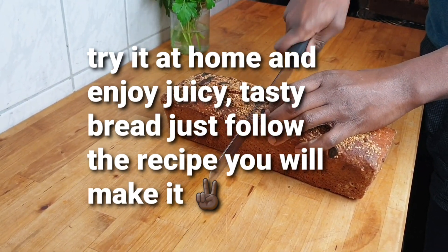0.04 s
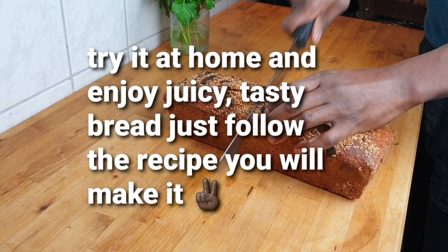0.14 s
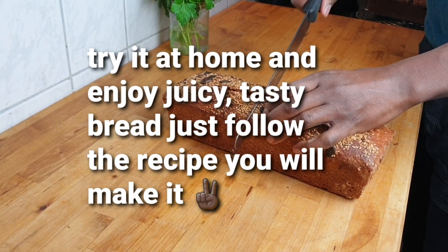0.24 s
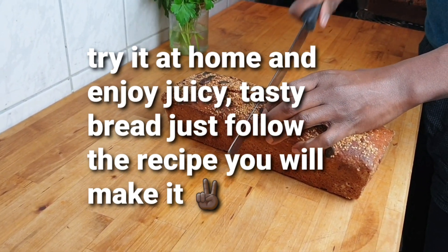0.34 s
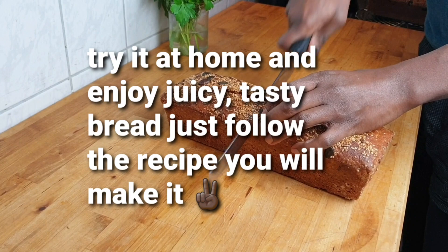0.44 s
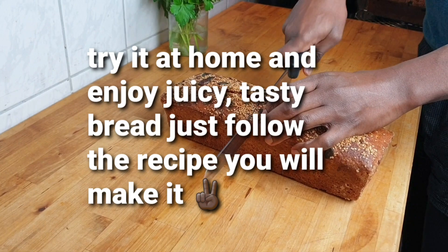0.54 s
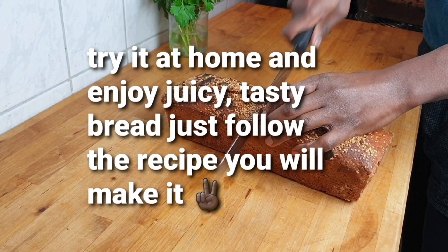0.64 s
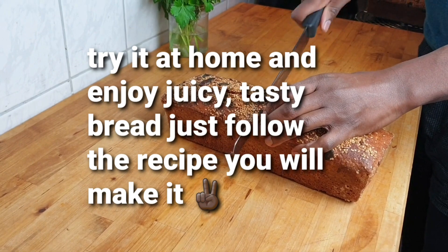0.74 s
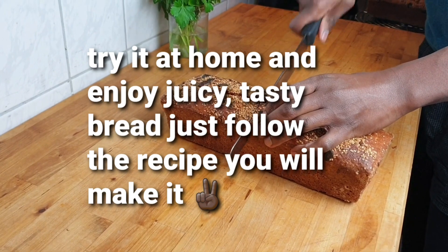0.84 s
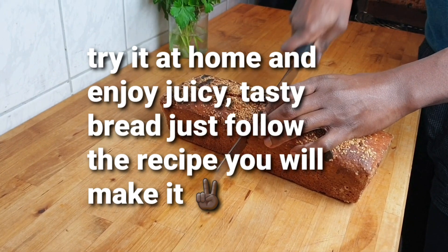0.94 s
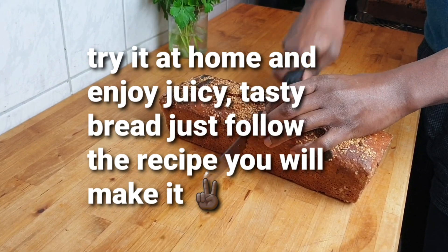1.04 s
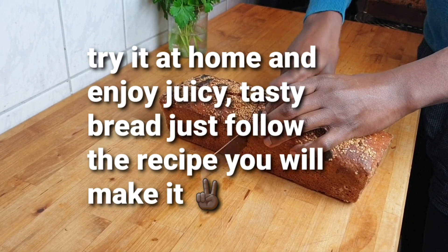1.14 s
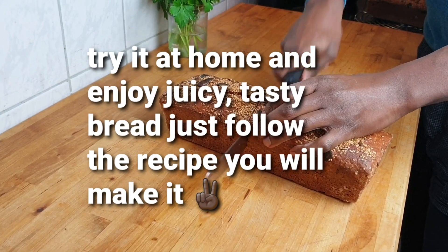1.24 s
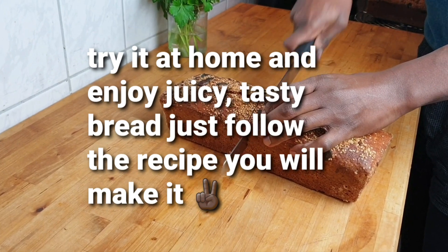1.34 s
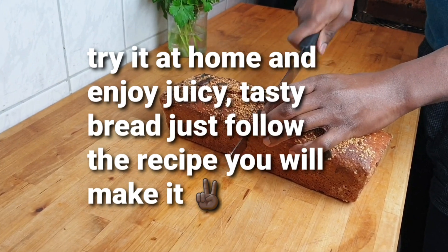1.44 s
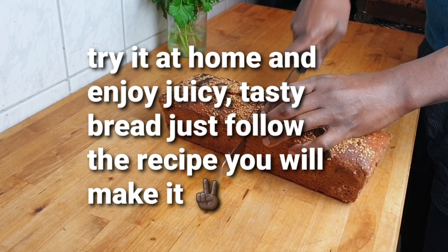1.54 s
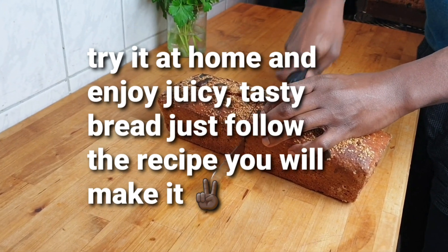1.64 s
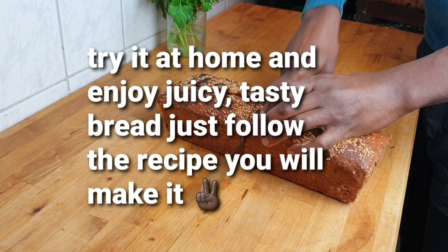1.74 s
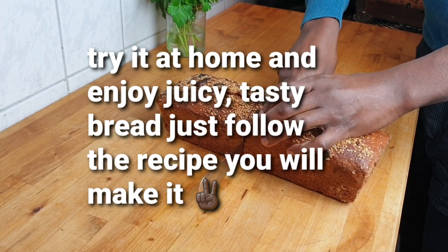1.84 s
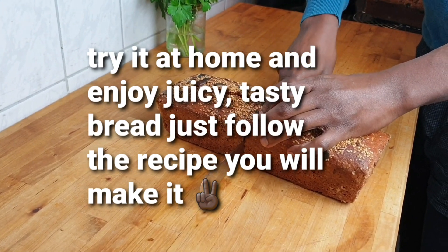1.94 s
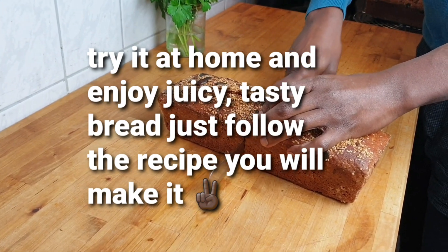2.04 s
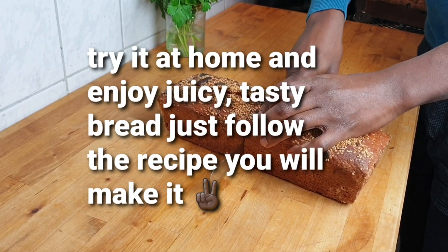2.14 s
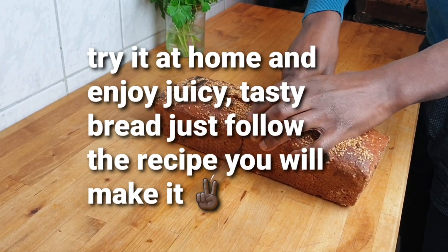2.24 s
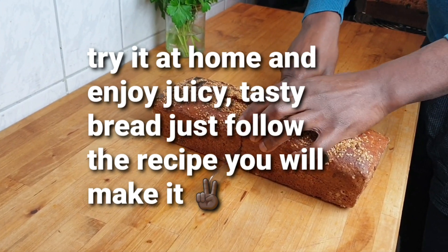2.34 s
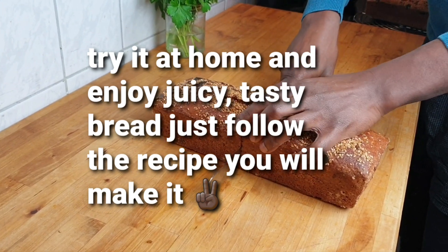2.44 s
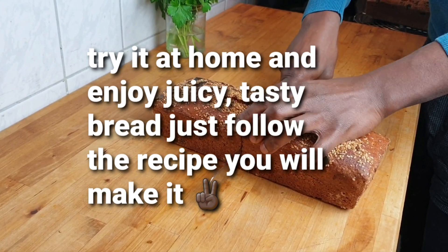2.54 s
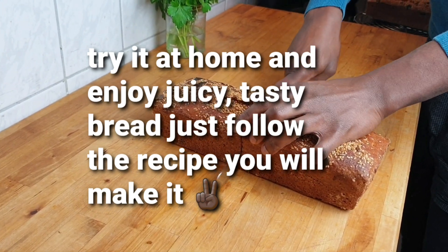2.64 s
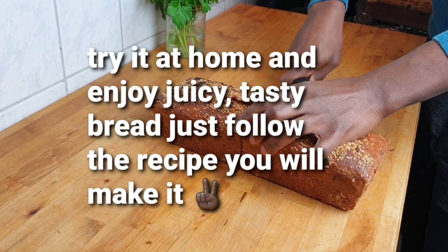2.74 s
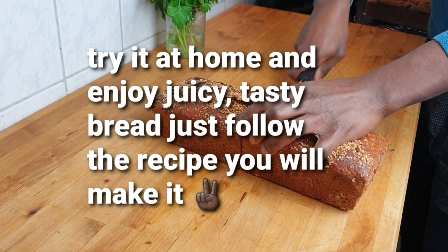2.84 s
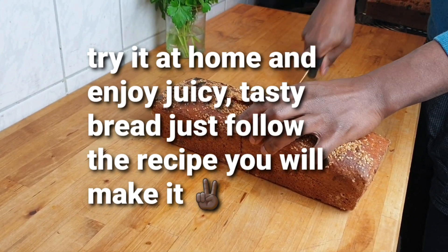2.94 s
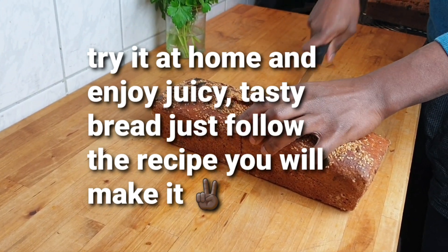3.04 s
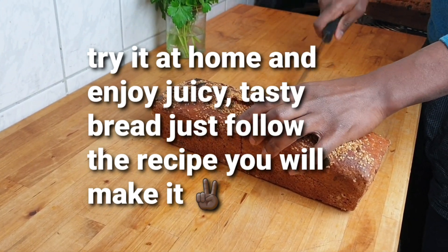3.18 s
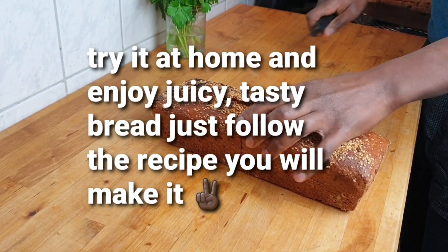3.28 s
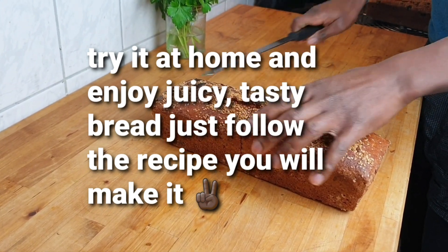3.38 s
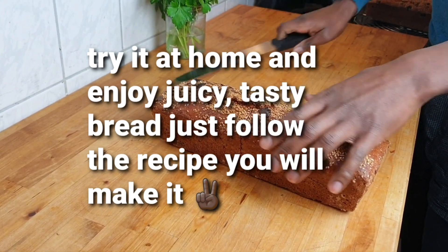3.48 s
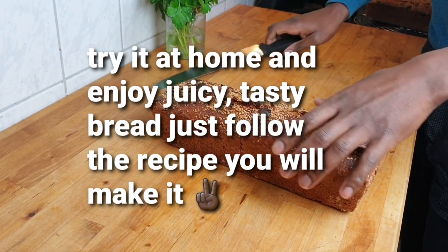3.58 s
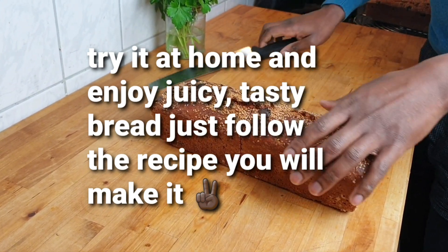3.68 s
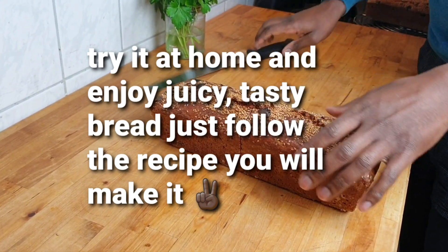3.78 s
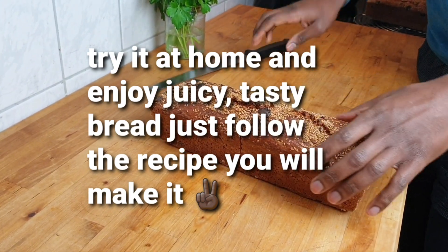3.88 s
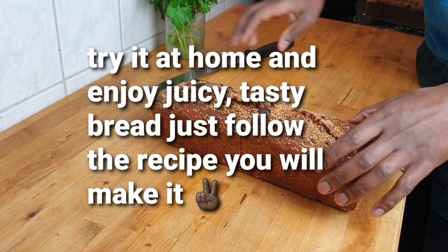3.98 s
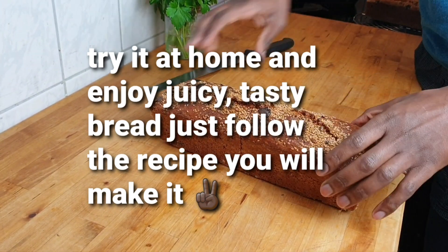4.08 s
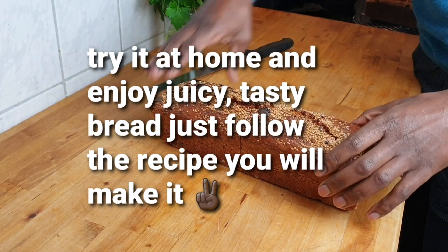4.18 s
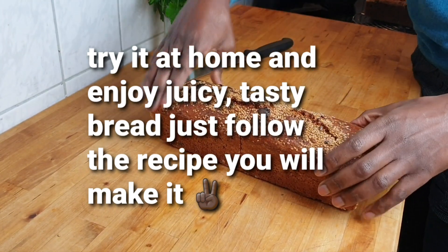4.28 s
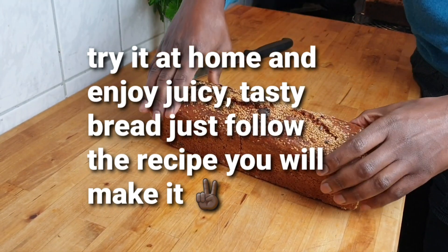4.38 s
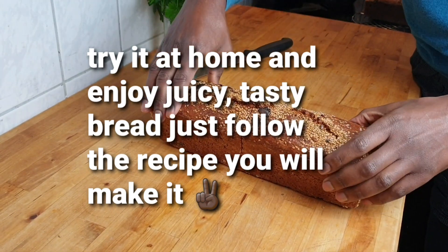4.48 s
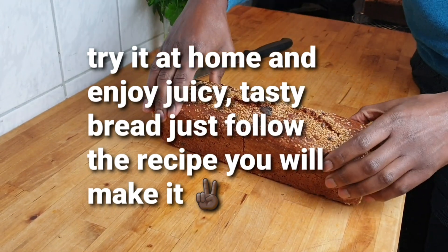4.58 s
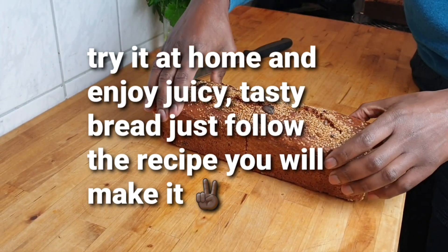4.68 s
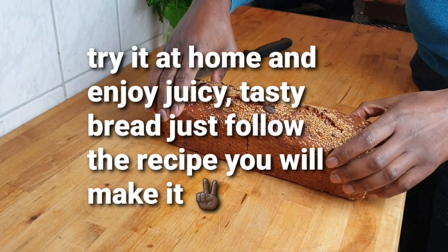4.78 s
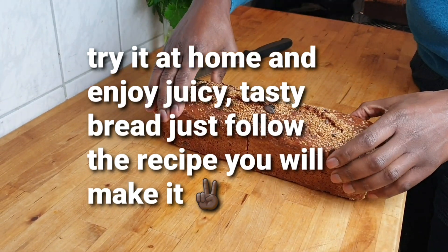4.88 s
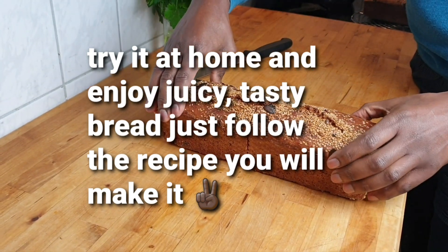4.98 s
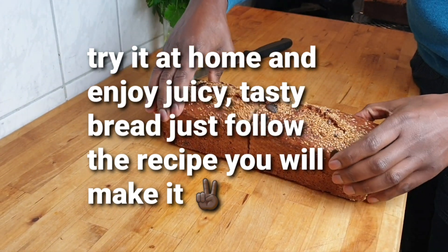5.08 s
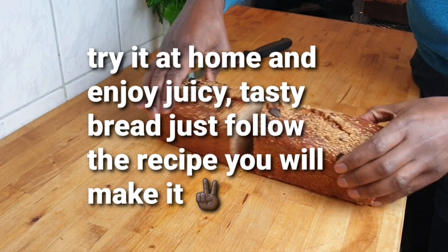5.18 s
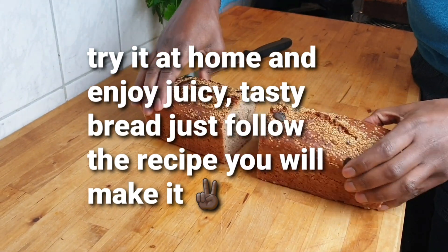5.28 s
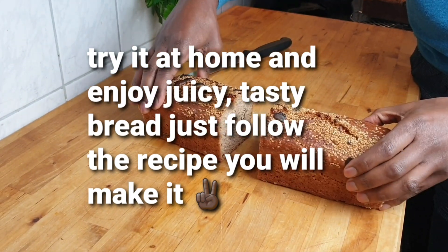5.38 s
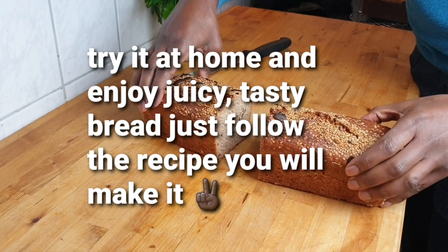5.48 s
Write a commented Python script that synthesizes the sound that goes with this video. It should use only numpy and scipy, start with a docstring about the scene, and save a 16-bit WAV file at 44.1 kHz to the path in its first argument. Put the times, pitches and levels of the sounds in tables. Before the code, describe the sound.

A knife saws in uneven, grainy strokes through a crusty loaf, booming the wooden counter, then drops with a clatter before the loaf bumps down.

```python
"""A knife saws through a crusty loaf: uneven noise, swelling with each stroke, drags, tears crumb and hisses on crust.
The loaf lies on a wooden counter that carries the microphone's stand, so the board booms as low, soft swings.
The blade is then dropped on the wood, where bright bursts and ringing tones clink as it rocks to rest.
Later a half loaf bumps down. A small hard kitchen answers with fading noise, and squeaks and a rumble are faint.
The microphone adds a steady hiss; only a faint part of the sound differs between left and right."""
import sys
import numpy as np
from scipy import signal
from scipy.fft import rfft, irfft, next_fast_len
from scipy.io import wavfile
from scipy.ndimage import uniform_filter1d, map_coordinates

SR = 44100
rng = np.random.default_rng(int(sys.argv[2]) if len(sys.argv) > 2 else 0)


def wav_out(sig):
    """Save sig, one row per channel (or a flat mono array), as 16-bit PCM at SR to the path in sys.argv[1]."""
    wavfile.write(sys.argv[1], SR, np.round(np.clip(np.atleast_2d(sig).T, -1, 1) * 32767).astype(np.int16))


def to_linear_factor(level_db):
    """Convert decibel levels (scalar or array-like) to linear amplitude factors."""
    exponent = np.asarray(level_db, float) / 20
    return 10 ** exponent


N = 243423  # length in samples

# ringing tones of the counter top: pitch_hz, width_hz, level_db
WOOD_TONES = [(201, 36, -3), (331.2, 110, -10), (515.5, 28, -4), (664, 34, -1.5), (786.2, 47, -4),
              (966.2, 29, 3), (1107, 46, -6.5), (1220, 82, -6.5), (1364, 200, -13), (1720, 89, -12),
              (1994, 960, -20)]
# colour of crust noise: pitch_hz, level_db (per Hz)
CRUST_COLOUR = [(2500, -21), (4130, -12.5), (5500, -4), (6740, 1.5), (8000, 6.5), (9730, 7.5), (11300, -3),
                (12200, -15), (14000, -22.5), (15000, -40), (15600, -90)]
# the knife rocks on the counter, each touch a clink and a knock: start_s, level_db
ROCKING_TOUCHES = [(3.7687, -37), (3.9802, -25), (4.0451, -26), (4.1015, -26.5), (4.1404, -30),
                   (4.175, -41)]


def unit(x):
    """Scale to an average strength (rms) of 1."""
    return x / np.sqrt(np.mean(x ** 2) + 1e-20)


def along(points, hz):
    """Read a curve of (Hz, value) points, with pitch on a log axis."""
    point_hz, value = np.transpose(points)
    return np.interp(np.log(hz + 1), np.log(point_hz + 1), value)


def filtered(x, response):
    """Multiply each frequency of x by a response, which may also shift its phase."""
    size = next_fast_len(x.shape[-1] + 8192)
    hz = np.fft.rfftfreq(size, 1 / SR)
    return irfft(rfft(x, size) * response(hz), size)[..., :x.shape[-1]]


def colour(x, spectrum):
    """Give x a smooth balance of low and high pitches."""
    return filtered(x, lambda hz: to_linear_factor(along(spectrum, hz)))


def resonate(x, tones):
    """Let x excite tones (Hz, width in Hz, dB), each a resonance that favours its own pitch."""
    def response(hz):
        total = 0
        for k, (centre, width, db) in enumerate(tones):
            loss = 1j * hz * width
            # neighbouring tones have opposite signs
            total = total + (-1) ** k * to_linear_factor(db) * loss / (centre ** 2 - hz ** 2 + loss)
        return total
    return filtered(x, response)


def wobble(rate):
    """A smooth random curve through rate random points a second."""
    points = rng.standard_normal(int(N / SR * 400) + 4)
    return map_coordinates(points, [np.arange(N) * np.clip(rate, 1, 390) / SR])


def grit(lumpy_db, rate, spike_db, share, patchy_db):
    """Friction: lumpy noise with small sudden slips and random patches of colour that make it grainy."""
    slips = (rng.random(N) < share) * to_linear_factor(spike_db * rng.random(N))
    lumps = to_linear_factor(lumpy_db * wobble(rate))
    z = signal.stft(rng.standard_normal(N) * lumps * (1 + slips), nperseg=256)[2]
    # smooth the patches over neighbouring pitches, then over time
    patches = uniform_filter1d(rng.standard_normal(z.shape), size=5, axis=0)
    patches = uniform_filter1d(patches, size=6, axis=1)
    return unit(signal.istft(z * to_linear_factor(patchy_db * unit(patches)), nperseg=256)[1][:N])


def rattles(rows, lumpy_db, rate):
    """Each contact is a lumpy burst of noise that starts at once and falls 20 dB over its length."""
    t = np.arange(N) / SR
    shape = np.zeros(N)
    for start, db, length, *_ in rows:
        shape += to_linear_factor(db - 20 * np.clip(t - start, 0, 1) / length) * (t >= start)
    return shape * rng.standard_normal(N) * to_linear_factor(lumpy_db * wobble(rate))


def unit_gain(response):
    """Gain that brings noise through a filter back to an average strength (rms) of 1."""
    return 1 / np.std(response(rng.standard_normal(N)))


def stroked(strokes, level_db, start_db, end_db, in_db_per_s, out_db_per_s, flat):
    """Gain over time: every stroke swells to its hardest moment, eases, and fades fast outside its span.
    start_db, end_db: drop from the hardest moment; a higher flat gives a flatter top."""
    start, hardest, end = [np.array(column)[:, None] for column in list(zip(*strokes))[:3]]
    t = np.arange(0, N / SR + .002, .002)
    before = np.clip((hardest - t) / (hardest - start), 0, 1)
    after = np.clip((t - hardest) / (end - hardest), 0, 1)
    drop_db = start_db * before ** flat + end_db * after ** flat
    drop_db += in_db_per_s * np.clip(start - t, 0, None)
    drop_db += out_db_per_s * np.clip(t - end, 0, None)
    gain = np.linalg.norm(to_linear_factor(level_db[:, None] - drop_db), axis=0)  # overlapping strokes add in power
    return np.interp(np.arange(N) / SR, t, gain)


def microphone_hiss():
    """The microphone's floor: steady coloured noise, alike on left and right."""
    # colour of the floor: pitch_hz, level_db (per Hz)
    hiss_colour = [(13, -34.5), (25, -10), (44, 0.5), (102, -5), (215, -28), (361, -34.5), (918, -33),
                   (3930, -41.5), (8710, -33.5), (11200, -41), (12200, -48.5), (15000, -56), (15600, -100)]
    return to_linear_factor(-68) * unit(colour(rng.standard_normal(N), hiss_colour))


def side_hiss():
    """A fainter noise, to be added on the left and subtracted on the right."""
    # colour of the difference: pitch_hz, level_db (per Hz)
    side_colour = [(60, -11), (260, -9), (900, -10), (2500, -15.5), (4500, -17.5), (8800, -8.5),
                   (11500, -16.5), (14500, -24), (15300, -70)]
    return to_linear_factor(-81) * unit(colour(rng.standard_normal(N), side_colour))


def rumble():
    """Noise narrowed to very low pitches swells once and fades."""
    # loudness of the rumble: time_s, level_db
    rumble_curve = [(2.9, -71), (3.1, -57), (3.35, -55.5), (3.6, -84)]
    time_s, level_db = np.transpose(rumble_curve)
    deep = resonate(rng.standard_normal(N), [(44, 25, 0)])
    deep = unit(resonate(deep, [(44, 35, 0)]))
    return to_linear_factor(np.interp(np.arange(N) / SR, time_s, level_db, -120, -120)) * deep


def kitchen(x):
    """The room answers x with a tail of noise in which each frequency dies at its own speed."""
    # how long the room rings: pitch_hz, time to fall 60 dB_s
    ring_times = [(100, .5), (1000, 0.42), (4000, 0.44), (10000, 0.24)]
    hz, t, z = signal.stft(rng.standard_normal(SR), SR, nperseg=256)
    fading = z * to_linear_factor(-60 * t / along(ring_times, hz)[:, None])
    tail = signal.istft(fading, SR, nperseg=256)[1]
    delayed = np.pad(x, (300, 0))  # in samples
    return signal.fftconvolve(delayed, tail / np.linalg.norm(tail))[:N]


def board(x):
    """The low swing of the board, steep on both flanks because a broad resonance follows the others."""
    # swings of the board: pitch_hz, width_hz, level_db
    board_tones = [(60, 35, -10.5), (93, 19.6, 3), (112.1, 27.8, -2), (141.3, 49, -12)]
    return resonate(resonate(x, board_tones), [(94.5, 330, 0)])


def thumps():
    """The board rocks under the loaf: a low tone swells and dies in a few soft cycles."""
    # swings: start_s, level_db (at the peak), pitch_hz, rise_s
    swings = [(0.301, -31.5, 79, 0.012), (0.467, -28.5, 87, 0.0051), (1.229, -26.5, 81.7, 0.011),
              (1.397, -24, 80.6, 0.022), (1.809, -27, 82.5, 0.026), (2.064, -38.5, 93, 0.0096),
              (2.177, -27, 79, 0.0059), (2.514, -37, 86, 0.01), (2.729, -29.5, 106.7, 0.034),
              (3.12, -45, 67.3, 0.015), (3.407, -44, 66.56, 0.0064), (3.871, -15.5, 99, 0.01),
              (4.778, -51.5, 113.7, 0.017), (5.268, -11, 76, 0.0076)]
    out, t = np.zeros(N + SR), np.arange(SR // 2) / SR
    for start, db, hz, rise in swings:
        u = t / rise
        swell = u * np.exp(1 - u)  # reaches 1 at the end of the rise
        out[round(start * SR):][:len(t)] += to_linear_factor(db) * swell * np.sin(2 * np.pi * hz * t)
    return out[:N]


def knocks():
    """Blunt blows ring the counter top and shake the board; a soft contact has little treble."""
    # blade, handle or loaf knocks the counter: start_s, level_db (before the gains below), length_s
    blow_list = [(.4, -58, 0.013), (.437, -52.5, .033), (.51, -55, .02), (.915, -83, 0.016),
                 (.992, -70, 0.017), (1.415, -51, 0.027), (1.479, -46.5, 0.012), (1.728, -38.5, 0.021),
                 (2.175, -58, 0.018), (2.252, -48.5, 0.032), (2.403, -52.5, 0.014), (3.598, -26.5, 0.041),
                 (3.665, -34.5, 0.028), (3.813, -13.5, 0.061), (3.871, -11.5, 0.032), (3.91, -19.5, 0.064),
                 (3.954, -21.5, 0.051), (4.02, -29, 0.022), (5.261, -30, 0.044), (5.296, -31.5, 0.071)]
    soft = lambda hz: 1 / (1 + 1j * hz / 2200) ** 3
    no_deep_bass = lambda hz: (1j * hz / (1j * hz + 45)) ** 2

    def wood(x):
        # clear tones over one broad resonance, for a dense crowd of weak ones
        return filtered(resonate(x, WOOD_TONES) + resonate(x, [(650, 410, -11.5)]), soft)

    rocking = [(start, db + 1.2, .038) for start, db in ROCKING_TOUCHES]
    blows = rattles(blow_list + rocking, lumpy_db=2.5, rate=260)
    ringing = to_linear_factor(-4.5) * unit_gain(wood) * wood(blows)
    shaking = to_linear_factor(-6.5) * unit_gain(board) * filtered(board(blows), no_deep_bass)
    return ringing + shaking


def blade():
    """Steel contacts chatter brightly and ring the blade's tones; touching the wood makes the ring flutter."""
    # dropped steel strikes wood: start_s, level_db (before the chatter's gain), length_s, ring_db (over level)
    strikes = [(3.595, -10.5, .025, -8), (3.8186, -33, .013, -13), (3.881, -3.5, .016, -22)]
    # the blade's tones: pitch_hz, level_db (before a random change), time to fall 60 dB_s (when free)
    steel_tones = [(4043, -20, .1), (5782, -20, .15), (6546, -12, .05), (7085, 0, .1), (7601, -15, .08),
                   (8680, -10, .06), (9300, -14, .08)]
    # colour of the chatter: pitch_hz, level_db (per Hz)
    clink_colour = [(1000, -38), (1800, -17), (4940, -14.5), (6650, -8.5), (8880, 1.5), (11000, -12.5),
                    (13500, -25), (15000, -43), (15700, -88.5)]
    out, t = np.zeros(N + SR), np.arange(SR // 2) / SR
    contacts = strikes + [(start, db, .009, -6) for start, db in ROCKING_TOUCHES]
    # share of the ring time left: less while the blade lies on wood
    shares = [1] * len(strikes) + [.6] * len(ROCKING_TOUCHES)
    for (start, db, _, ring_db), share in zip(contacts, shares):
        ring = np.zeros(len(t))
        for hz, level, fall_s in steel_tones:
            tone_db = level + rng.normal(0, 2) - 60 * t / fall_s / share
            ring += to_linear_factor(tone_db) * np.sin(2 * np.pi * hz * t)
        onset = 1 - np.exp(-t / .002)
        out[round(start * SR):][:len(t)] += to_linear_factor(db + ring_db) * ring * onset
    bright = lambda x: colour(x, clink_colour)
    chatter = to_linear_factor(-6) * unit_gain(bright) * bright(rattles(contacts, lumpy_db=-3, rate=360))
    flutter = to_linear_factor(2.5 * wobble(130))
    return flutter * out[:N], chatter


def squeaks():
    """The flat of the blade rubs the crust: a faint, breathy band of noise, some sliding a little in pitch."""
    # squeaks: start_s, end_s, first_pitch_hz, last_pitch_hz, level_db (wavering around this)
    squeak_list = [(.16, .33, 2700, 2800, -83), (1.25, 1.4, 1760, 1880, -73), (1.42, 1.5, 2750, 2750, -79),
                   (2.22, 2.36, 2900, 3100, -81)]
    t, out = np.arange(N) / SR, np.zeros(N)
    for start, end, hz_first, hz_last, db in squeak_list:
        turns = np.cumsum(np.interp(t, [start, end], [hz_first, hz_last])) / SR
        gate = np.sin(np.pi * np.clip((t - start) / (end - start), 0, 1)) ** 0.23
        # random strengths of sine and cosine make a band of noise around the pitch
        breath = wobble(380) * np.sin(2 * np.pi * turns) + wobble(380) * np.cos(2 * np.pi * turns)
        out += to_linear_factor(db + 2.5 * wobble(35)) * gate * breath
    return out


def cracks():
    """A flake of crust snaps: a few milliseconds of bright noise."""
    # snaps: start_s, level_db
    snaps = [(0.036, -46), (0.3995, -58), (0.9428, -45.5), (1.013, -53), (1.052, -44.5), (1.148, -44),
             (1.4277, -48), (1.459, -52), (1.4798, -51.5), (1.797, -57), (1.8302, -47), (1.8492, -38),
             (1.8625, -65), (1.961, -57.5), (2.6162, -59.5), (2.728, -47.5), (2.762, -45), (2.8076, -56),
             (2.848, -43.5)]
    bright = lambda x: colour(x, CRUST_COLOUR)
    bursts = rattles([(start, db, .007) for start, db in snaps], lumpy_db=2.5, rate=380)
    return unit_gain(bright) * bright(bursts)


def friction():
    """Strokes shake the board, drag through the wood and tear crumb and crust."""
    # all strokes: start_s, hardest_s, end_s, drag_db, board_sway_db, crust_hiss_db
    pushes = [(-.1, .04, 0.091, -41.5, -23.5, -56), (.395, .51, 0.6, -47, -32.5, -60),
              (.9, 1.1, 1.206, -43.5, -31, -59.5), (1.76, 1.855, 1.878, -38, -30, -64),
              (2.24, 2.33, 2.377, -51.5, -48.5, -65), (2.66, 2.81, 2.94, -43, -40, -64),
              (2.87, 2.98, 3.105, -45.5, -61, -63.5), (3.02, 3.15, 3.238, -53, -59, -66)]  # forward, teeth tearing in; the last three rows overlap as one long, uneven cut
    pulls = [(0.159, 0.22, 0.37, -54.5, -47, -64), (0.637, 0.76, .84, -75, -64, -67.5),
             (1.254, 1.41, 1.497, -54, -37.5, -67.5), (1.556, 1.716, 1.97, -52, -40.5, -65),
             (2.002, 2.165, 2.253, -58, -45, -71.5), (2.488, 2.575, 2.87, -67.5, -55.5, -78),
             (3.26, 3.4, 3.56, -101, -72, -77)]  # return strokes, teeth skating back
    slides = [(4.274, 4.45, 4.7, -71.5, -55, -70.5), (4.55, 4.74, 4.83, -72, -55, -71.5),
              (5.219, 5.249, 5.28, -53.5, -38.5, -62), (5.282, 5.294, 5.341, -38, -24.5, -44.5)]  # hands and loaf slide on crust and wood
    # colours of the drag, the tearing crumb and the rasp of hard crust: pitch_hz, level_db (per Hz)
    drag_colour = [(88, -33), (150, -15), (205, -1), (242, -9), (424, -11.5), (476, -9.5), (792, -15),
                   (1800, -54), (2340, -67), (3960, -120)]
    crumb_colour = [(710, -27.5), (1200, -0.5), (1900, -12), (2600, -11.5), (4500, -21), (6500, -18.5),
                    (11500, -24), (13800, -44), (14800, -44.5), (15500, -100)]
    rasp_colour = [(1800, -31), (2800, -4), (3900, -12.5), (5200, 2), (7000, -14), (10500, -11.5),
                   (12500, -3.5), (14300, -14), (15200, -80)]

    strokes = pushes + pulls + slides
    drag_db, sway_db, hiss_db = np.transpose(strokes)[3:]
    # crumb tearing relative to the drag
    tear_db = np.repeat([-14.5, -34, -11.5], [len(pushes), len(pulls), len(slides)])
    judder = wobble(28)  # the teeth catch unevenly, heard in wood and bread alike

    through_s = 3.25  # the blade sinks from the top crust to the bottom by this time
    depth = np.clip(np.arange(N) / SR / through_s, 0, 1)
    sinking = lambda top_db, bottom_db: to_linear_factor(top_db + (bottom_db - top_db) * depth)

    sway = unit(board(rng.standard_normal(N)))
    sway *= stroked(strokes, sway_db, start_db=10.7, end_db=6.5, in_db_per_s=640, out_db_per_s=170, flat=1.4)

    # the counter's ring grows as the blade nears it
    rub = grit(lumpy_db=-1.0, rate=240, spike_db=18.0, share=0.015, patchy_db=2.0)
    drag = unit(colour(rub, drag_colour)) + sinking(-19, -8.5) * unit(resonate(rub, WOOD_TONES))
    drag *= to_linear_factor(0.12 * judder)
    drag *= stroked(strokes, drag_db, start_db=13.7, end_db=7.3, in_db_per_s=960, out_db_per_s=440, flat=1.48)

    # the rasp of hard crust on the teeth weakens as the blade sinks
    tearing = grit(lumpy_db=-1.0, rate=260, spike_db=24, share=0.0087, patchy_db=2.0)
    crumb = unit(colour(tearing, crumb_colour)) + sinking(-4, -21) * unit(colour(tearing, rasp_colour))
    crumb *= to_linear_factor(0.46 * judder)
    crumb *= stroked(strokes, drag_db + tear_db, start_db=37, end_db=4.6,
                     in_db_per_s=380, out_db_per_s=940, flat=1.85)

    scrape = grit(lumpy_db=0.5, rate=180, spike_db=10.5, share=0.022, patchy_db=3.5)
    crust_hiss = unit(colour(scrape, CRUST_COLOUR)) * to_linear_factor(0.3 * judder)
    crust_hiss *= stroked(strokes, hiss_db, start_db=11.3, end_db=7.4,
                          in_db_per_s=1100, out_db_per_s=400, flat=1.73)
    return sway + drag + crumb + crust_hiss


def scene():
    """All sources, their room and the microphone's floor; only a faint hiss differs between left and right."""
    ring, chatter = blade()
    bright, blunt = chatter + cracks(), knocks()
    rubbing = friction() + squeaks()
    room = to_linear_factor(-5.0) * kitchen(bright) + to_linear_factor(-6) * kitchen(blunt)
    room += to_linear_factor(-9.5) * kitchen(rubbing + .5 * ring)
    stand = lambda hz: (1j * hz / (1j * hz + 30)) ** 6  # the stand passes little below the board's swing
    near = filtered(room + bright + blunt + rubbing + ring + thumps(), stand)
    mid = near + rumble() + microphone_hiss()
    return mid + side_hiss() * np.array([[1], [-1]])


def low_pass(x):
    """Removes everything above the highest recorded frequency."""
    return signal.sosfilt(signal.butter(12, 15670, fs=SR, output="sos"), x)


def record(dry):
    """Turn the finished mix into the final sound."""
    return low_pass(dry)


dry = scene()
out = record(dry)
wav_out(out)
```